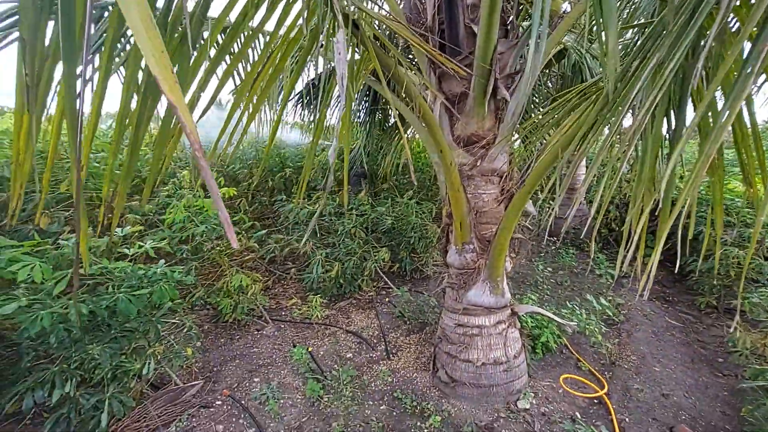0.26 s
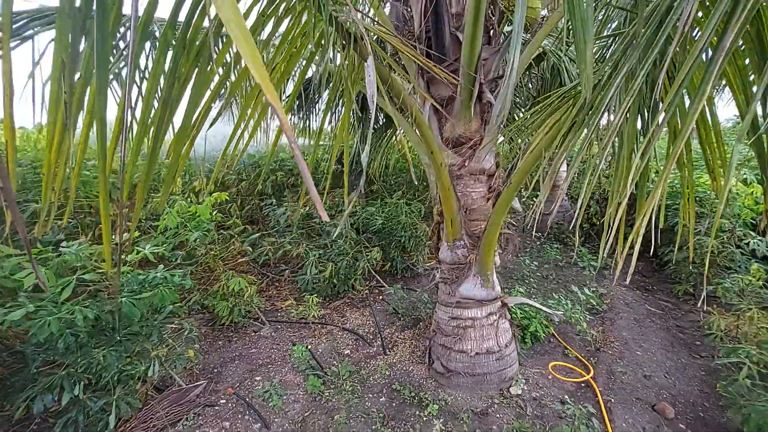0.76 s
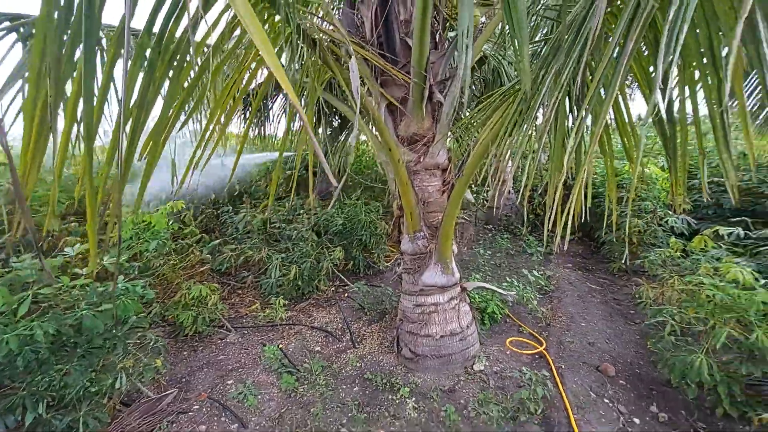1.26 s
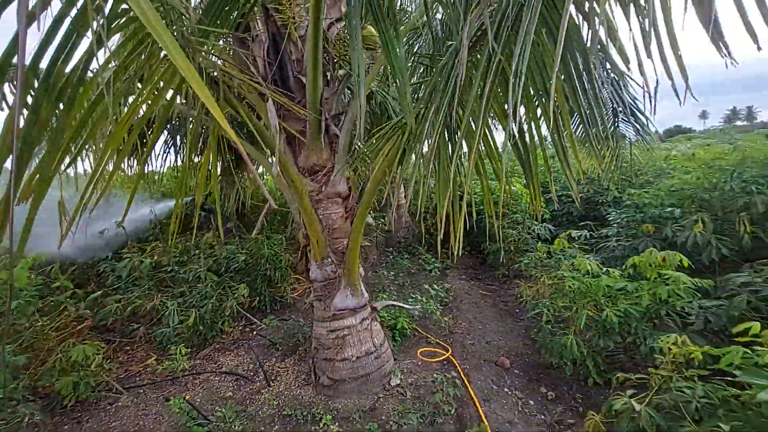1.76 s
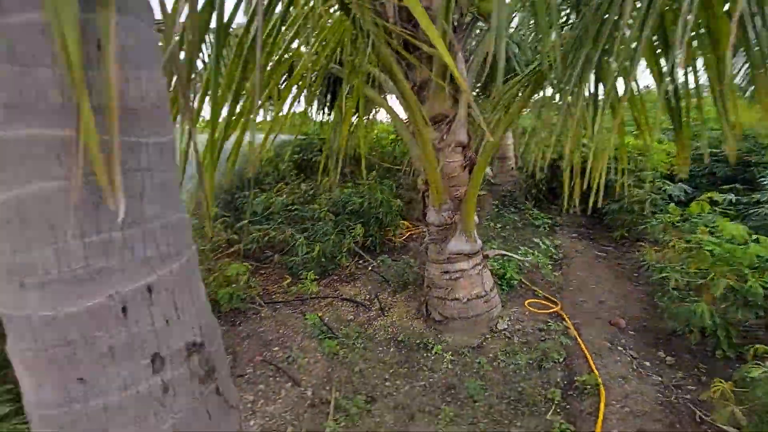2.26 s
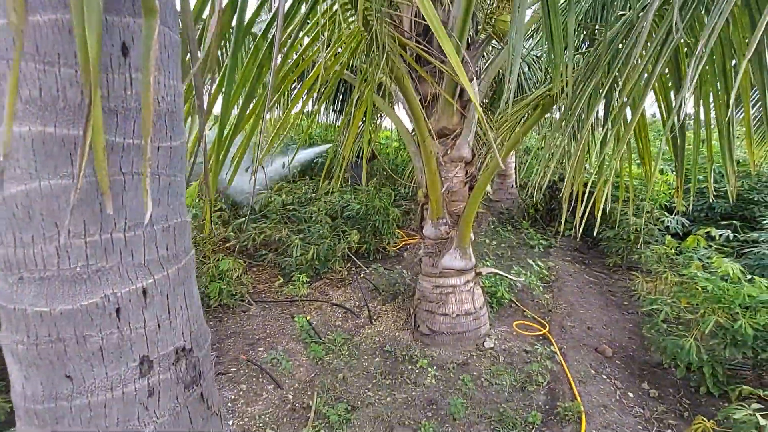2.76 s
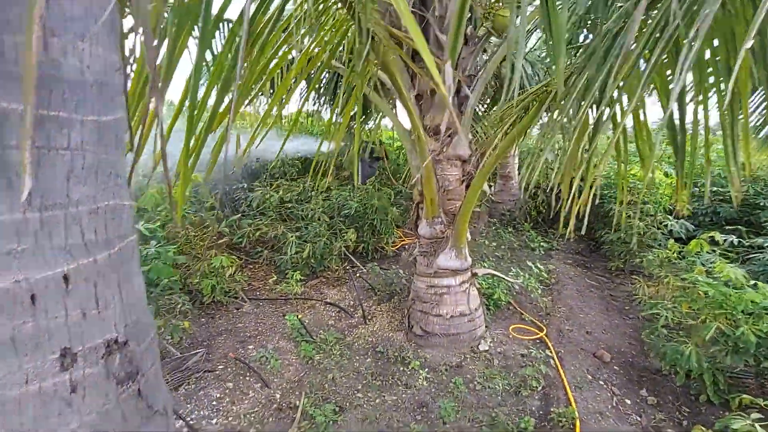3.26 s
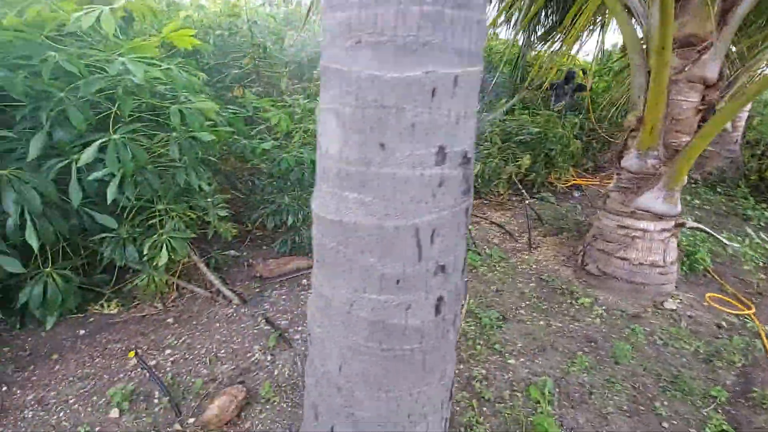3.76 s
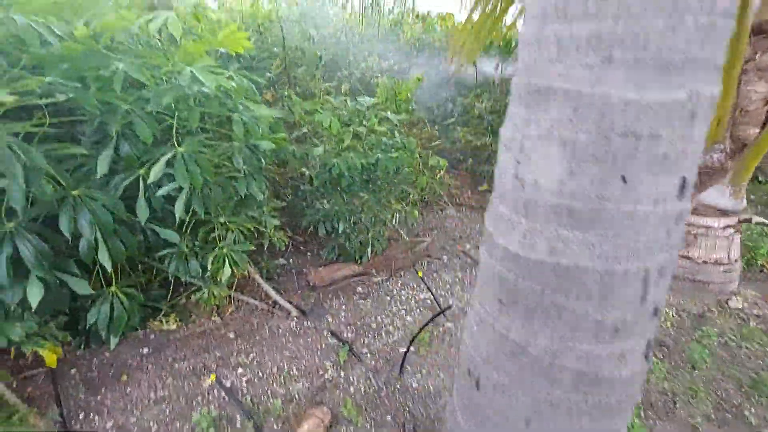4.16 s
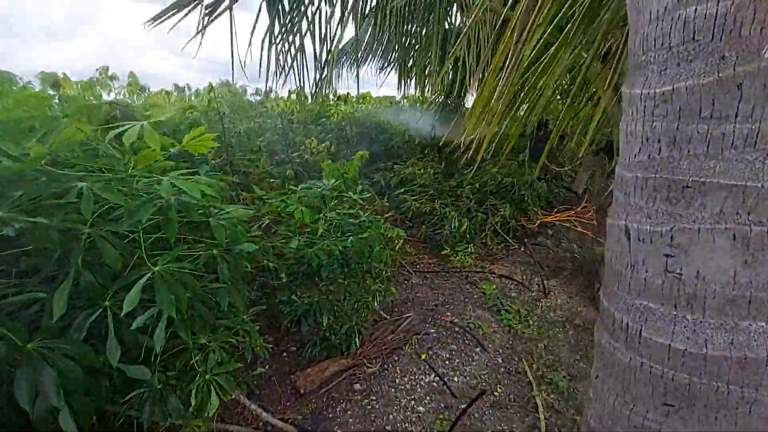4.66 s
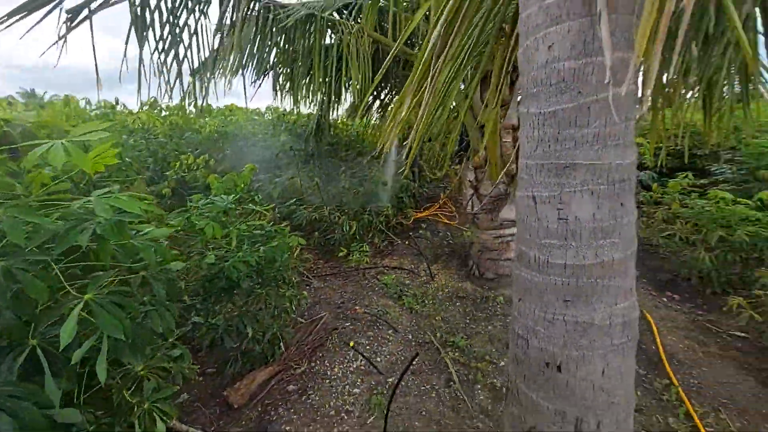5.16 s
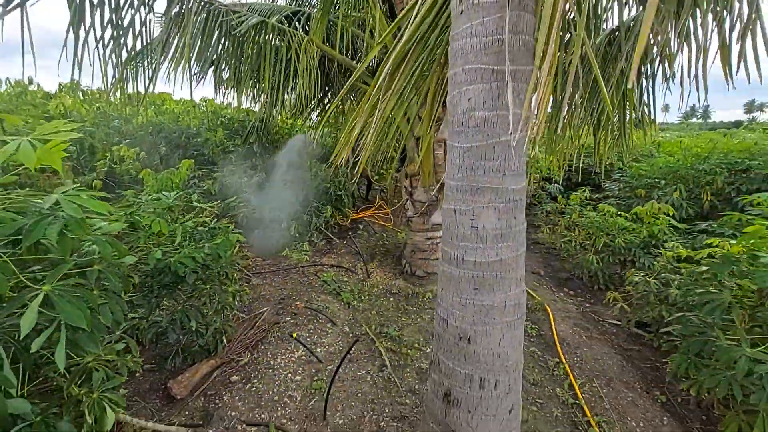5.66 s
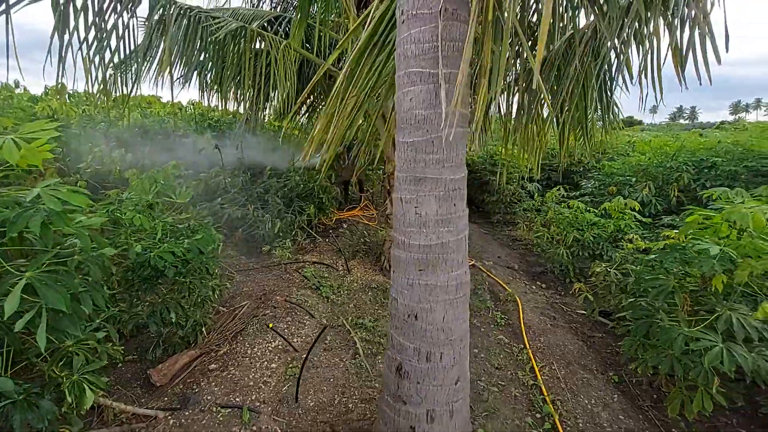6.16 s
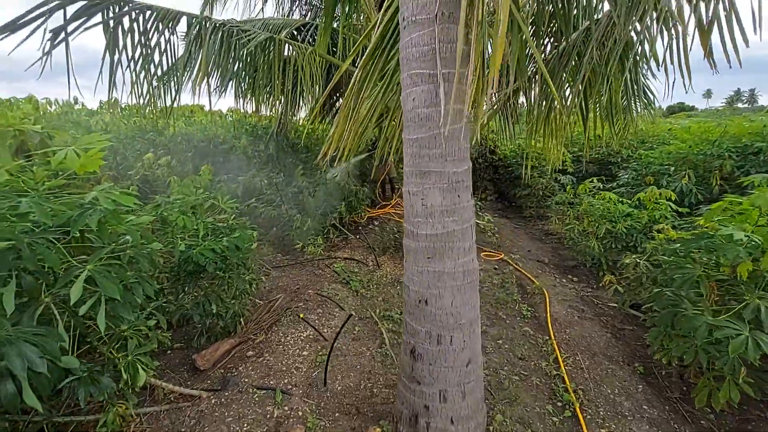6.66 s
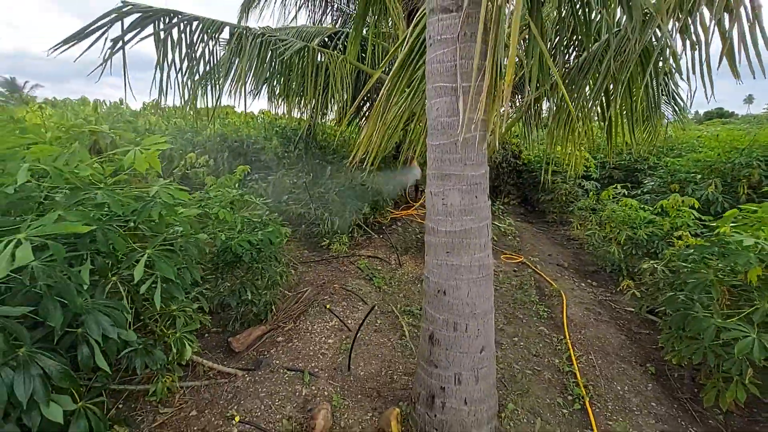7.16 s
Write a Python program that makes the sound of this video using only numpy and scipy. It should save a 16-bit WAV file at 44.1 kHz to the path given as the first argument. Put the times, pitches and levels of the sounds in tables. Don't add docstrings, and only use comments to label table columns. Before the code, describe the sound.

Outdoors in a crop field, a high-pressure lance hisses continuously, its fine droplets pattering on leaves, while a one-cylinder engine throbs low and rapidly with clatter and tiny pump-valve chirps. Twigs snap close by at the start and most sharply around the middle, followed by dry frond scratches. A small bird calls in three short series. A handheld stereo microphone moves along, the left side duller in the treble.

```python
import sys
import numpy as np
from scipy import signal
from scipy.fft import rfft, irfft, next_fast_len
from scipy.io import wavfile
from scipy.ndimage import uniform_filter1d, map_coordinates

SR = 44100
rng = np.random.default_rng(int(sys.argv[2]) if len(sys.argv) > 2 else 0)


def generate_wav(signal):
    frames = np.transpose(np.atleast_2d(signal))
    scaled = np.clip(frames, -1, 1) * 32767
    pcm = np.round(scaled).astype(np.int16)
    wavfile.write(sys.argv[1], SR, pcm)


def elevation(decibels):
    levels = np.asarray(decibels, float)
    return 10 ** (levels / 20)


N = 326340

# t/s, jet level/dB, fineness/dB as the mist turns toward the microphone
LANCE_SWING = [(0, -41.5, 0), (.27, -42, -0.5), (1.07, -41, 0), (1.5, -42.5, 1.5), (2, -42, 2),
               (2.35, -44.5, 1), (2.78, -41.5, 2.5), (3.12, -41.5, -0.5), (3.5, -40.5, 0), (3.92, -40, 0),
               (4.1, -46, 4), (4.35, -45, -0.5), (4.9, -42.5, 2.5), (5.2, -40, -1), (5.5, -42.5, 0.5),
               (6.5, -42, 1), (7.05, -42, 2.5), (7.4, -48.5, 2.5)]
# f/Hz, level/dB
JET_SPECTRUM = [(900, -40), (1500, -16), (2100, -14), (2700, -9), (4000, -6), (5500, -3), (6700, 0),
                (7700, -5), (10000, -5), (12500, -9), (14200, -11.5), (15900, -11)]
# f/multiple of the firing rate,
# level/dB
PIPE_RESPONSE = [(2, -25.5), (3, 4), (4, -0.5), (5, -0.5), (6, -6.5), (7, -17), (8, -22), (9, -36.5),
                 (10, -24.5), (12, -44), (14, -29.5), (16, -48.5),
                 (.25, -93), (1, -53), (100, -83)]
# f/Hz, level/dB
RUMBLE_SPECTRUM = [(18, -45), (28, -14), (42, -0.5), (65, 2), (110, -3.5), (170, -3), (230, -15),
                   (320, -10.5), (480, -19), (800, -56)]
# f/Hz, level/dB
CLATTER_SPECTRUM = [(200, -16), (330, -20.5), (490, -6), (620, -2.5), (720, -3.5), (880, -3), (1100, 0),
                    (1450, -0.5), (2000, -7), (3000, -17)]
# t/s, clatter level/dB, ground band f/Hz, ground band level/dB
WALK = [(0, -50.5, 744, -56), (.7, -50.5, 785, -53), (1.45, -50.5, 900, -49), (1.95, -49.5, 1019, -50.5),
        (2.4, -50, 715, -68), (3.05, -49, 745, -55), (3.58, -50, 848, -46.5), (3.8, -50.5, 833, -56),
        (4.16, -51, 780, -60), (4.5, -52.5, 726, -54), (4.8, -51.5, 696.5, -57), (5.3, -47.5, 660, -55),
        (5.9, -49.5, 680, -58), (6.3, -48.5, 709, -53), (6.75, -50, 711, -55), (7.2, -50, 733, -52),
        (7.4, -55.5, 740, -48)]
# t/s, length/s, level/dB, centre f/Hz
TWIG_SNAPS = [(.002, 0.043, -21.5, 6300), (0.387, .013, -22, 8500), (0.395, 0.059, -25, 7360),
              (2.376, 0.029, -30, 6950), (2.822, .045, -31.5, 3480), (3.28, .09, -20, 4360),
              (3.432, 0.027, -13.5, 3600), (3.442, 0.018, -21, 3000), (3.565, 0.057, -17, 5600),
              (4.475, 0.028, -40, 2900), (4.512, 0.034, -36.5, 2650), (4.539, 0.054, -34, 3260),
              (4.588, .025, -38, 2600), (5.062, .022, -28, 5950)]
# t/s, length/s, level/dB, centre f/Hz
FROND_SWEEPS = [(0.436, .035, -37, 6500), (3.315, 0.039, -14.5, 3850), (3.468, 0.027, -24, 4000),
                (3.516, 0.024, -22.5, 5960), (3.415, .02, -32, 7460), (3.547, .035, -23.5, 5940),
                (3.577, 0.021, -24.5, 4050), (3.618, .035, -29, 8080), (3.746, 0.037, -31, 9100),
                (3.764, .02, -21, 8850), (3.8, 0.024, -25, 7450), (3.815, .04, -32, 8000),
                (3.87, 0.044, -19.5, 9700), (5.092, 0.071, -43, 2480), (6.326, .035, -27.5, 6200),
                (6.386, .035, -26, 6040), (6.503, 0.051, -26.5, 7000), (6.696, 0.12, -28.5, 6900),
                (6.971, 0.11, -30.5, 8000), (7.032, 0.051, -28, 6600)]
# t/s into the turn, start f/Hz, end f/Hz, length/s, level/dB
PUMP_VALVES = [
    (0.02, 1440, 1330, 0.014, -39.5),
    (0.08, 1370, 1150, 0.021, -44.5),
    (0.124, 1500, 1400, 0.013, -41),
    (.128, 1750, 1650, .014, -50),
    (.125, 850, 780, 0.013, -53.5),
    (.128, 630, 520, 0.016, -47),
]
# t/s of the falling note, level/dB, start f/Hz, pip level/dB, pip f/Hz
BIRD_CALLS = [
    (.381, -46.5, 3100, -55, 4150),
    (.714, -46.5, 3200, -55, 4150),
    (1.039, -44.5, 3250, -47, 4150),
    (4.029, -47, 3150, -56, 4100),
    (4.35, -47.5, 3200, -44, 4150),
    (4.668, -47.5, 3050, -55, 4100),
    (5.085, -48, 2900, -46, 3880),
    (6.585, -41, 3200, -49, 4150),
    (6.878, -41, 3400, -45, 3980),
    (7.2, -44, 3300, -47, 3950),
]
# f/Hz, level/dB
PORT_DIFFERENCE = [(60, -1), (250, 0), (450, -.7), (750, 2), (1300, 4), (2000, 1.5), (2800, -3),
                   (4200, -7.5), (5400, -14), (6400, -17.5), (7100, -8.5), (8800, -6), (10500, -3.3),
                   (13000, -.8)]
# f/Hz, correlation
PORT_LIKENESS = [(60, .9), (160, .93), (280, .89), (520, .75), (850, .64), (1200, .5), (1600, .2),
                 (4000, .15)]
# f/Hz, phase/rad
LEFT_LEAD_PHASE = [(55, .22), (120, .32), (300, .38), (700, .9), (1100, 1.7), (1500, 2.1), (2000, 1.5)]

SPATTER_FOLLOWS, MIST_FOLLOWS = 0.65, 1
SPATTER_PER_FINE, MIST_PER_FINE = -.6, 1.2
FIRING_HZ, FIRST_S = 20.678, .0198
PATH_HZ, TILT_DB_PER_OCTAVE = 780, 4
DEEP_DB, DEEP_DB_PER_S, DEEP_WANDER_DB = -38, 0.34, 1.1
UPPER_DB, UPPER_WANDER_DB = -34, 0.2
SNAP_SHAPE, SWEEP_SHAPE = (0.24, 0.29, .9), (1, 0.37, 1)
LEFT_TREBLE_DB = -1.86
TOP_HZ = 15850


def unit(x):
    return x / np.sqrt(np.mean(x ** 2) + 1e-20)


def along(points, hz):
    f, v = np.transpose(points)
    return np.interp(np.log(hz + 1), np.log(f + 1), v)


def curves(rows):
    s, *cols = np.transpose(rows)
    return [np.interp(np.arange(N) / SR, s, c) for c in cols]


def wobble(rate):
    return map_coordinates(rng.standard_normal(int(N * rate / SR) + 4), [np.arange(N) * rate / SR])


def filtered(x, response):
    n = x.shape[-1]
    m = next_fast_len(n + 8192)
    return irfft(rfft(x, m) * response(np.fft.rfftfreq(m, 1 / SR)), m)[..., :n]


def causal(gain):
    c = irfft(np.log(gain))
    half = len(c) // 2
    c = np.r_[c[0], 2 * c[1:half], np.zeros(len(c) - half)]
    return np.exp(rfft(c))


def patchy(patchy_db):
    z = signal.stft(rng.standard_normal((2, N)), nperseg=512)[2]
    field = uniform_filter1d(rng.standard_normal(z.shape[1:]), size=8, axis=0)
    field = uniform_filter1d(field, size=12, axis=1)
    return signal.istft(z * elevation(patchy_db * unit(field)), nperseg=512)[1][:, :N]


def crackle(n, share, spread_db):
    hit = rng.random(n) < share
    size = elevation(spread_db * rng.standard_normal(n))
    return unit(hit * size * rng.standard_normal((2, n)))


def stereo(pair, spectrum):
    turn = lambda hz: np.arccos(np.clip(along(PORT_LIKENESS, hz), -1, 1)) / 2
    colour = lambda hz: elevation(along(spectrum, hz)) * [np.cos(turn(hz)), np.sin(turn(hz))]
    mid, side = filtered(pair, colour)
    return np.array([mid + side, mid - side]) / np.std(mid)


def spray():
    jet = .9 * patchy(patchy_db=1.6) + .38 * crackle(N, share=.12, spread_db=2.5)
    jet = filtered(jet, lambda hz: elevation(along(JET_SPECTRUM, hz)))
    spatter = lambda hz: np.clip((4600 - hz) / 1200, 0, 1)
    mist = lambda hz: np.clip((hz - 7500) / 2000, 0, 1)
    hiss = lambda hz: 1 - spatter(hz) - mist(hz)
    flutter_db = 0.99 * wobble(5.4) + 0.3 * wobble(30) + .5 * wobble(90)
    level_db, fine_db = curves(LANCE_SWING)
    swing_db = level_db - level_db.mean()
    spatter_db = SPATTER_FOLLOWS * swing_db + SPATTER_PER_FINE * fine_db - 1.56
    hiss_db = swing_db + 7.5
    mist_db = MIST_FOLLOWS * swing_db + MIST_PER_FINE * fine_db + 5.5
    out = 0
    for db, part in [(spatter_db, spatter), (hiss_db, hiss), (mist_db, mist)]:
        out = out + elevation(db + 0.2 * wobble(5.6)) * unit(filtered(jet, part))
    return elevation(level_db.mean() + flutter_db) * out


def exhaust():
    deep_db = DEEP_DB + DEEP_DB_PER_S * np.arange(N) / SR + DEEP_WANDER_DB * wobble(7.1)
    upper_db = UPPER_DB + UPPER_WANDER_DB * wobble(4.57)
    k = np.arange(-3, int(N / SR * FIRING_HZ))
    chance = rng.standard_normal((len(k), 2))
    when = FIRST_S + k / FIRING_HZ + 0.00045 * chance[:, 0]
    load_db = 0.3 * chance[:, 1] + 0.09 * np.sin(2 * np.pi * k / 3)
    lead = SR // 4
    blows = np.bincount(np.round(when * SR).astype(int) + lead, elevation(load_db), N + lead)
    pipe = [(FIRING_HZ * m, db) for m, db in sorted(PIPE_RESPONSE)]
    boom = filtered(blows, lambda hz: 1j * causal(elevation(along(pipe, hz))))[lead:]
    upper = filtered(boom, lambda hz: np.clip((hz - 66) / 12, 0, 1))
    deep = boom - upper
    return elevation(deep_db) * unit(deep) + elevation(upper_db) * unit(upper)


def engine():
    heard_db, band_hz, _ = curves(WALK)
    tilt_db = TILT_DB_PER_OCTAVE * np.log2(band_hz / PATH_HZ)
    cycle = 2 * np.pi * FIRING_HZ * np.arange(N) / SR
    stroke_db = 0.8 * np.cos(cycle + 0.29) + 0.25 * np.cos(cycle / 3 - .4)
    rattle = stereo(patchy(patchy_db=1.5), CLATTER_SPECTRUM)
    low = filtered(rattle, lambda hz: np.clip((1000 - hz) / 200, 0, 1))
    high = rattle - low
    clatter = elevation(heard_db - tilt_db + 6.5) * low + elevation(heard_db + tilt_db + 3.0) * high
    rumble = elevation(-43.0 + 1.05 * wobble(2.4)) * stereo(patchy(patchy_db=-0.63), RUMBLE_SPECTRUM)
    shade = lambda hz: elevation([[.5], [-.5]] * along(PORT_DIFFERENCE, np.minimum(hz, 2000)))
    return filtered(exhaust() + elevation(stroke_db) * clatter + rumble, shade)


def ground():
    _, hz, db = curves(WALK)
    slow = filtered(rng.standard_normal((2, N)), lambda f: 1 / (1 + (f / 120) ** 2))
    turn = 2 * np.pi * np.cumsum(hz) / SR
    return elevation(db) * unit(slow[0] * np.cos(turn) + slow[1] * np.sin(turn))


def brushing():
    out = np.zeros((2, N + SR))
    t = np.arange(SR // 4) / SR - .1
    n = len(t)
    touches = [(row, SNAP_SHAPE) for row in TWIG_SNAPS] + [(row, SWEEP_SHAPE) for row in FROND_SWEEPS]
    for (s, length, db, hz), shape in touches:
        rise, hold, fall = length * np.array(shape)
        shape_db = -20 * (np.maximum(-t, 0) / rise + np.maximum(t - hold, 0) / fall)
        knots, bands = rng.standard_normal(n // 70 + 2), rng.standard_normal(64)
        clumps = elevation(3.1 * np.interp(np.arange(n) / 70, np.arange(len(knots)), knots))
        pair = .8 * rng.standard_normal((2, n)) + .45 * crackle(n, share=.14, spread_db=2.5)
        scratch = clumps * (pair + .3 * pair[::-1])
        peak = lambda f: elevation(-6.5 * np.log2((f + 50) / hz) ** 2 + 0.76 * along(JET_SPECTRUM, f))
        bright = lambda f: peak(f) + elevation(-24.5) * (f > hz)
        dull = lambda f: elevation(-19 - 5 * np.log2(hz / 4000) - 5 * np.log2((f + 50) / 950) ** 2)
        leaf = lambda f: elevation(3 * np.interp(f / 350, np.arange(64), bands))
        colour = lambda f: (bright(f) + dull(f)) * leaf(f)
        burst = elevation(db - 3 + shape_db) * unit(filtered(scratch, colour))
        out[:, round(s * SR):][:, :n] += burst
    return out[:, SR // 10:][:, :N]


def pump():
    out = np.zeros(N + SR)
    t = np.arange(SR // 25) / SR
    starts = np.arange(int(N / SR * FIRING_HZ / 3) + 1) * 3 / FIRING_HZ
    for s, start_hz, end_hz, length, db in PUMP_VALVES:
        u = np.clip(t / length, 0, 1)
        chance = rng.standard_normal((len(starts), 4))
        pitch = (start_hz + (end_hz - start_hz) * u) * (1 + 0.0436 * chance[:, :1])
        chirps = np.sin(2 * np.pi * np.cumsum(pitch, axis=1) / SR + 3 * chance[:, 3:])
        chirps *= elevation(db + 3.5 * chance[:, 1:2]) * np.sin(np.pi * u ** 1.84)
        first = np.round((starts + s + 0.001365 * chance[:, 2]) * SR).astype(int)
        at = first[:, None] + np.arange(len(t))
        out += np.bincount(at.ravel(), chirps.ravel(), N + SR)
    heard_db = curves(WALK)[0]
    return elevation([[-.6], [-5]] + 0.84 * (heard_db - heard_db.mean())) * out[:N]


def bird():
    out = np.zeros(N + SR)
    t = np.arange(SR // 23) / SR
    u = t / t[-1]
    for s, db, hz, pip_db, pip_hz in BIRD_CALLS:
        pitch = hz - (hz - 1950) * u ** .6
        flutter = elevation(1.3 * rng.standard_normal(9)[(u * 8).astype(int)])
        swell = np.sin(np.pi * u ** .5) ** 1.1 * flutter
        out[round(s * SR):][:len(t)] += elevation(db) * swell * np.sin(2 * np.pi * np.cumsum(pitch) / SR)
        pip = np.sin(np.pi * np.clip(t / .03, 0, 1)) * np.sin(2 * np.pi * (pip_hz * t + 3500 * t ** 2))
        out[round((s - .058) * SR):][:len(t)] += elevation(pip_db) * pip
    decay = elevation(-60 * np.arange(SR // 10) / SR / .12)
    echoes = rng.standard_normal((2, SR // 10)) * decay
    wet = signal.fftconvolve(out[None, :N], echoes / np.linalg.norm(echoes[0]), axes=1)[:, :N]
    return elevation([[4.6], [2.6]]) * out[:N] + elevation(-5) * wet


def scene():
    treble = spray() + brushing()
    left_gain = lambda hz: elevation(along(PORT_DIFFERENCE, hz) + LEFT_TREBLE_DB * (hz > 3500))
    treble[0] = filtered(treble[0], left_gain)
    lead = lambda hz: np.exp([[.5j], [-.5j]] * along(LEFT_LEAD_PHASE, hz))
    machine = filtered(engine() + ground() + pump(), lead)
    return treble + machine + bird()


def roll_off(x):
    return signal.sosfilt(signal.butter(12, 15980, fs=SR, output="sos"), x)


def record(dry):
    return roll_off(filtered(dry, lambda hz: hz < TOP_HZ))


dry = scene()
out = record(dry)
generate_wav(out)
```